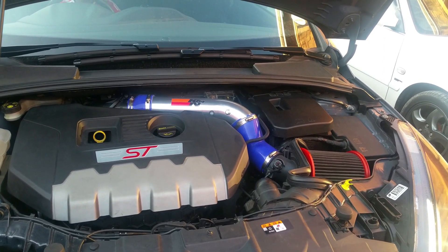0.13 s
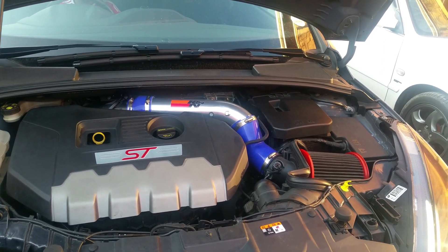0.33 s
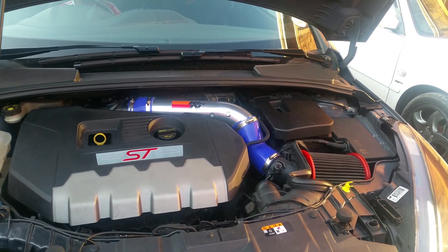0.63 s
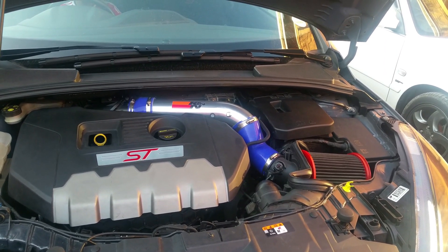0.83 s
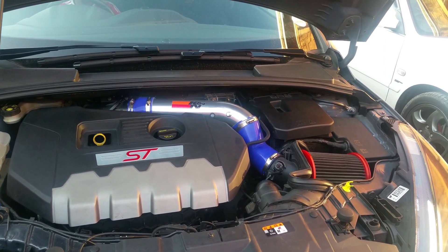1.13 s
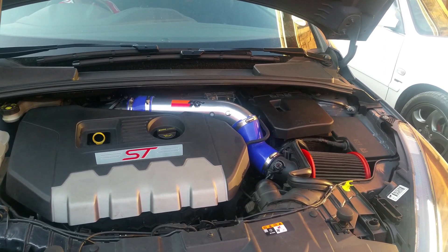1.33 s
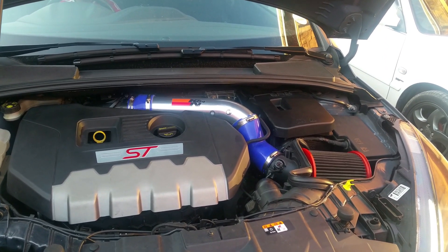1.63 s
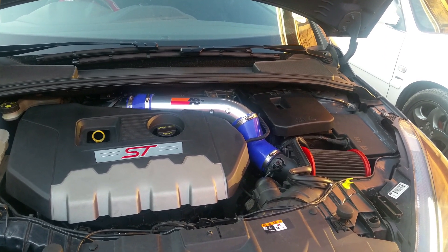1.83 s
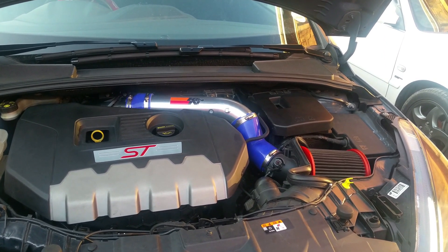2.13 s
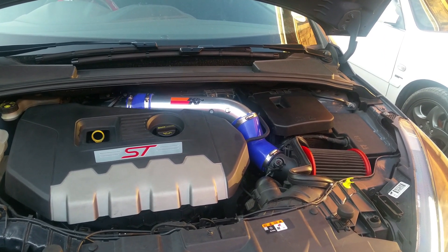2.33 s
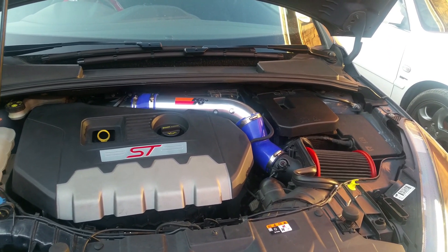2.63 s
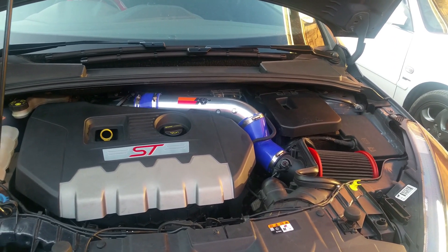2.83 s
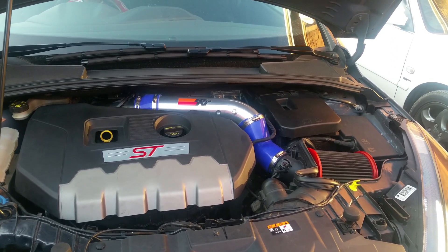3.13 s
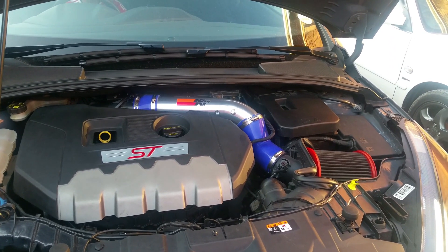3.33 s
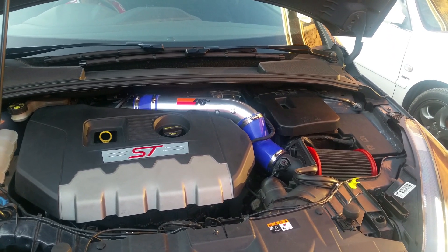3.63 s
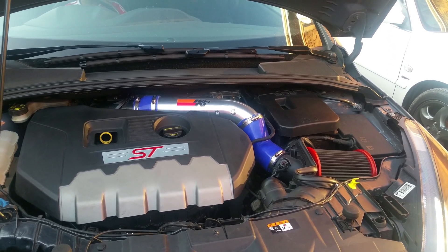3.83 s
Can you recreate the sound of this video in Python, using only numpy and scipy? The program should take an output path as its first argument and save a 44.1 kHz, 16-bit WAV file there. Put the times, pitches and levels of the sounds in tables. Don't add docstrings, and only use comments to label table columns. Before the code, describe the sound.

A car engine in an open bay falls from a roaring rev to a throbbing, ticking idle, heard close in stereo outdoors; a dog barks repeatedly off to the left with short yard echoes.

```python
import sys
import numpy as np
from scipy import signal
from scipy.fft import rfft, irfft
from scipy.io import wavfile
from scipy.ndimage import uniform_filter1d

SR = 44100
rng = np.random.default_rng(int(sys.argv[2]) if len(sys.argv) > 2 else 0)


def transcribe(signal):
    frames = np.atleast_2d(signal).T
    limited = np.clip(frames, -1, 1)
    pcm = np.round(limited * 32767).astype(np.int16)
    wavfile.write(sys.argv[1], SR, pcm)


def ratio(d):
    e = np.asarray(d, float) / 20
    return 10 ** e


N = 176400

IDLE_HZ = 29
# (time [s], firing rate [Hz])
SPEED = [(0, 67), (.3, 66), (.55, 59), (.76, 56), (1.01, 48.3), (1.25, 44.2), (1.5, 40.7), (2, 36.5),
         (2.57, 32.35), (3, 30.05), (3.5, 28.85), (4, 28.25)]
# (time [s], level [dB])
EFFORT = [(0.0, -33), (0.31, -33.5), (0.47, -35), (0.79, -36), (1.49, -38), (1.65, -35), (1.82, -33.5),
          (1.96, -37.5), (2.74, -38), (2.9, -37.5), (3.54, -37.5), (4.0, -37)]
CYLINDERS = [-7, 1.5, -7, -5.5]


def engine():
    t = np.arange(N) / SR
    hz = along(SPEED, t)
    turns = np.cumsum(hz) / SR
    octaves = np.log2(hz / IDLE_HZ)
    firing = strokes(turns + .41, .58, CYLINDERS)
    pump = pump_ticks(turns, t)
    throb = 1 + .41 * evened(firing) + .22 * pump
    knock = noise_pair([(1, 0), (2, 0.011)], [(1, 0), (2, 0.0044)], octaves)
    working = block_noise(octaves, throb)
    working = working + cover_panels(knock * firing)
    working = working + intake_boom(knock * throb, octaves)
    working = working + alternator_whine(turns, hz)
    working = working + air_hiss(octaves, pump, t)
    return ratio(along(EFFORT, t)) * working + exhaust_thump(turns, hz)


# (frequency [Hz], level [dB])
BLOCK = [(40, -27), (150, -14.5), (380, -19), (520, -6), (2400, -11), (3200, -12.5), (5200, -14.5),
         (7400, -34.5)]
# (frequency [Hz], change [dB per octave])
ROAR = [(40, -4.5), (150, -13), (350, 23), (600, 3), (1400, 13.5), (3000, 6.5), (7000, 5.5)]


def block_noise(octaves, throb):
    return ratio(9) * noise_pair(BLOCK, ROAR, octaves) * throb / 2


# (frequency [Hz], width [Hz], level [dB])
PANELS = [(510.5, 28, -0.5), (1547, 27, -1), (2337, 66, 0), (4090, 220, 4.5), (4590, 67, -5.5)]


def cover_panels(knock):
    return ratio(-0.5) * evened(rung(knock, PANELS))


# (frequency [Hz], width [Hz], level [dB])
INTAKE = [(131.8, 47, -6.5), (193.7, 24, -5.5), (233.5, 11.5, -5.5), (342, 28, 0.5), (892, 89, 3),
          (1534, 450, -10)]


def intake_boom(knock, octaves):
    level_db = -11.5 + 17.5 * octaves
    gusts = ratio(4.5 * wander(N, size=700))
    return ratio(level_db) * evened(rung(knock * gusts, INTAKE))


# (multiple of firing rate [1], level [dB])
ORDERS = [(1, -41), (2, -47.5), (3, -53)]
# (frequency [Hz], level [dB])
PIPE = [(25, -43), (38, 5), (48, -4.5), (62, -2.5), (75, -2), (100, 0.5), (130, -9), (210, -7)]


def exhaust_thump(turns, hz):
    thump = 0
    for k, db in ORDERS:
        level_db = db + read(PIPE, k * hz) + 2 * wander(N, size=4000)
        thump = thump + ratio(level_db) * np.sin(2 * np.pi * k * turns)
    return thump


# (frequency [Hz], level [dB])
WHINE_BAND = [(570, -12), (620, 0), (700, -1), (790, -1), (880, -14)]


def alternator_whine(turns, hz):
    order = 20.15
    whine = np.sin(2 * np.pi * order * turns + .25 * wander(N, size=900))
    level_db = 4 - 4 - 3 * wander(N, size=2500) + read(WHINE_BAND, order * hz)
    return whine * ratio(level_db)


def pump_ticks(turns, t):
    start_s, decay, valve_early = 1.15, .13, .18
    pump_turns = .75 * turns + .49
    pump = strokes(pump_turns, decay, [0])
    valve = strokes(pump_turns + valve_early, decay, [0])
    return evened(pump + ratio(-2) * valve) * np.clip((t - start_s) / .1, .15, 1)


# (frequency [Hz], level [dB])
HISS = [(5000, -59), (7500, -10), (8600, 8.5), (9600, 9), (11800, 13.5), (14000, 10.5), (15200, -36)]


def air_hiss(octaves, pump, t):
    flutter_hz, flutter_end_s = 13.75, .49
    surge = np.clip((flutter_end_s - t) / .02, 0, 1)
    flutter = 1 + .6 * surge * np.cos(2 * np.pi * (flutter_hz * t + 0.75))
    hiss = ratio(-8) * noise_pair(HISS, ROAR, octaves) * (1 + 1.1 * pump) / 2
    return hiss * flutter * ratio(4.5 * surge)


# (start [s], clear part [s], clear level [dB], hoarse level [dB], pitch [Hz])
BARKS = [
    (-.03, 0.066, -21, -21.5, 695),
    (.487, 0.047, -13, -15.5, 738),
    (.982, 0.049, -11.5, -15.5, 694.6),
    (1.457, 0.053, -12, -15.5, 690),
    (1.962, 0.057, -11.5, -18, 716.8),
    (2.913, 0.055, -11.5, -16.5, 710.4),
    (3.308, 0.072, -11, -19.5, 666.3),
    (3.718, .06, -14.5, -14.5, 647),
]


def dog():
    lead = SR // 10
    dry = np.zeros(N + SR)
    for s, *voice in BARKS:
        sound = bark(*voice)
        dry[lead + round(s * SR):][:len(sound)] += sound
    wet = signal.fftconvolve(dry[None], yard_echoes(), axes=1)[:, :N + SR]
    return (dry + ratio(-2) * wet)[:, lead:lead + N]


def yard_echoes():
    t60_s, gap_s = 0.36, 0.0102
    t = np.arange(SR // 2) / SR
    taps = np.zeros((2, SR // 2))
    at = np.arange(0, SR // 2 - 20, 20) + rng.integers(0, 20, (2, (SR // 2 - 1) // 20))
    np.put_along_axis(taps, at, rng.choice([-1., 1.], at.shape), 1)
    taps *= ratio(-60 * t / t60_s) * (t > gap_s)
    return taps / np.linalg.norm(taps[0])


# (level [dB], delay [s])
PARTIALS = [(0.5, 0.018), (-11.5, .0), (-13, .014), (-28, 0.014)]


def yelp(t, clear_s, top_hz):
    scoop = .22 * np.exp(-t / .013)
    turns = np.cumsum(top_hz * (1 - scoop + 0.0094 * wander(len(t), size=200))) / SR
    clear = 0
    for k, (db, late) in enumerate(PARTIALS):
        shimmer_db = 3.5 * min(k + .5, 1) * wander(len(t), size=250)
        rise = np.clip((t - late) / .009, .1, 1)
        tone = np.cos(2 * np.pi * ((k + 1) * turns + rng.random()))
        clear = clear + ratio(db + shimmer_db) * rise * tone
    return clear * np.sqrt(2) * ratio(-6 * np.maximum(1 - t / clear_s, 0))


# (frequency [Hz], width [Hz], level [dB])
THROAT = [(495.6, 83, -9), (656, 83, 1.5), (984, 196, 6.5), (1510, 670, -3.5), (1885, 210, 1),
          (2113, 104, -8.5)]


def hoarse_voice(t, top_hz):
    slow = np.cumsum(.37 * top_hz * (1 + 0.1123 * wander(len(t), size=100))) / SR
    pulses = sum(np.cos(2 * np.pi * k * slow) for k in range(1, 11))
    air = 0.29
    drive = (1 - air) * evened(pulses) + air * rng.standard_normal(len(t))
    return evened(rung(drive, THROAT))


def bark(clear_s, clear_db, hoarse_db, top_hz):
    break_s, hold_s, fade_s = .02, 0.039, 0.022
    t = np.arange(0, .3, 1 / SR)
    broken = 1 / (1 + np.exp(-(t - clear_s) / (break_s / 4)))
    clear = ratio(clear_db) * (1 - broken) * yelp(t, clear_s, top_hz)
    opening = 1 / (1 + np.exp(-(t - 0.81 * clear_s) / (break_s / 2)))
    fade = np.exp(-np.maximum(t - clear_s - hold_s, 0) / fade_s)
    hoarse = ratio(hoarse_db) * opening * fade * hoarse_voice(t, top_hz)
    return np.minimum(t / .009, 1) * (clear + hoarse)


# (time [s], level [dB], frequency [Hz], width [Hz])
TICK = (2.451, -13, 2700, 400)


def tick():
    s, db, hz, width = TICK
    t = np.maximum(np.arange(N) / SR - s, 0)
    return ratio(db) * np.exp(-np.pi * width * t) * np.sin(2 * np.pi * hz * t)


# (frequency [Hz], likeness [0 to 1])
SAME = [(60, 0.88), (290, 1), (630, 1), (1400, 0.22), (3000, 0.17), (8000, 0.15), (14000, 0.31)]


def noise_pair(colour, per_octave, octaves):
    frames, hz = N // 128 + 5, np.fft.rfftfreq(512, 1 / SR)
    a, b, c, d, patches = rng.standard_normal((frames, 257, 5)).T
    patches = uniform_filter1d(patches, size=5, axis=0)
    patches = evened(uniform_filter1d(patches, size=16, axis=1))
    same = np.clip(read(SAME, hz), -1, 1)[:, None]
    left, other = a + 1j * b, c + 1j * d
    z = np.array([left, same * left + np.sqrt(1 - same ** 2) * other])
    flat = ratio(read(colour, hz))[:, None]
    rev = np.interp(np.arange(frames) * 128, np.arange(N), octaves)
    tilt_db = read(per_octave, hz)[:, None] * rev
    z *= flat / np.sqrt(np.mean(flat ** 2)) * ratio(2 * patches + tilt_db)
    return signal.istft(z, nperseg=512, noverlap=384)[1][:, :N] / 20


def strokes(turns, decay, pattern_db):
    k = turns.astype(int)
    size_db = np.asarray(pattern_db)[k % len(pattern_db)] + 0.5 * rng.standard_normal(400)[k]
    return uniform_filter1d(ratio(size_db) * np.exp(-(turns % 1) / decay), size=60)


def rung(x, body):
    total = 0
    for k, (hz, width, db) in enumerate(body):
        ring = resonate(resonate(x, hz, width), hz, 2 * width)
        total = total + (-1) ** k * ratio(db) * ring / np.sqrt(width)
    return total


def resonate(x, hz, width):
    turn = np.exp(2j * np.pi * np.cumsum(hz * np.ones(x.shape[-1])) / SR)
    r = np.exp(-np.pi * width / SR)
    return 2 * (turn * signal.lfilter([1 - r], [1, -r], x / turn + 1e-18)).real


def wander(count, size):
    smooth = uniform_filter1d(rng.standard_normal(count), size=size)
    return evened(uniform_filter1d(smooth, size=size))


def evened(x):
    return x / np.sqrt(np.mean(x ** 2) + 1e-20)


def read(points, hz):
    f, value = np.transpose(points)
    return np.interp(np.log(hz + 1), np.log(f + 1), value)


def along(curve, t):
    s, value = np.transpose(curve)
    return np.interp(t, s, value)


def scene():
    return engine() + dog() + tick()


def band_limit(x):
    return signal.sosfilt(signal.butter(12, 15100, fs=SR, output="sos"), x)


# (frequency [Hz], left minus right [dB])
LEAN = [(60, 0.5), (300, 2), (700, 2), (1400, 9), (2400, 10.5), (4500, -0.3), (9000, -5.7), (13000, 3.5)]


def record(dry):
    left_lag_s, limit = 0.0002677, .93
    hz = np.fft.rfftfreq(N, 1 / SR)
    lean = ratio(read(LEAN, hz) / 2)
    ports = np.array([lean * np.exp(-2j * np.pi * hz * left_lag_s), 1 / lean])
    x = irfft(rfft(dry) * ports, N) / limit
    mix = limit * x / (1 + x ** 6) ** (1 / 6)
    return band_limit(mix)


dry = scene()
out = record(dry)
transcribe(out)
```